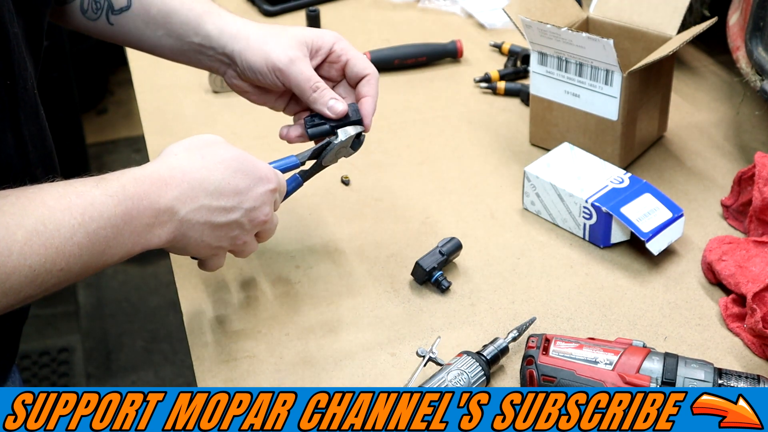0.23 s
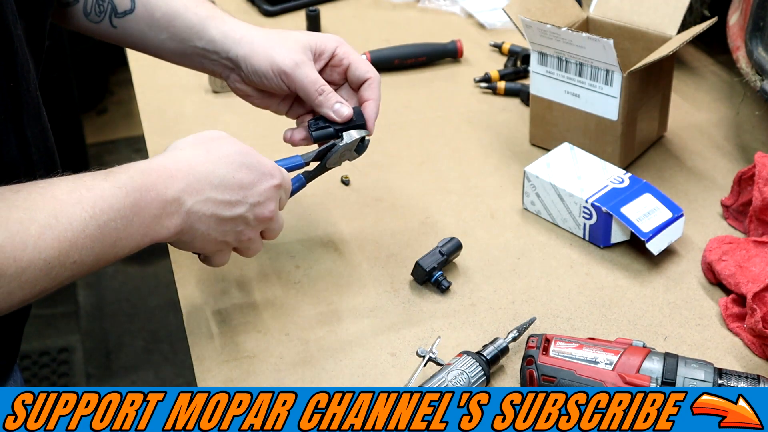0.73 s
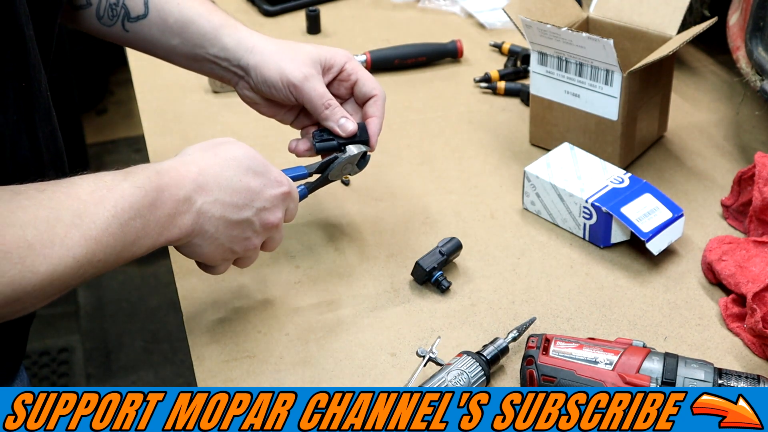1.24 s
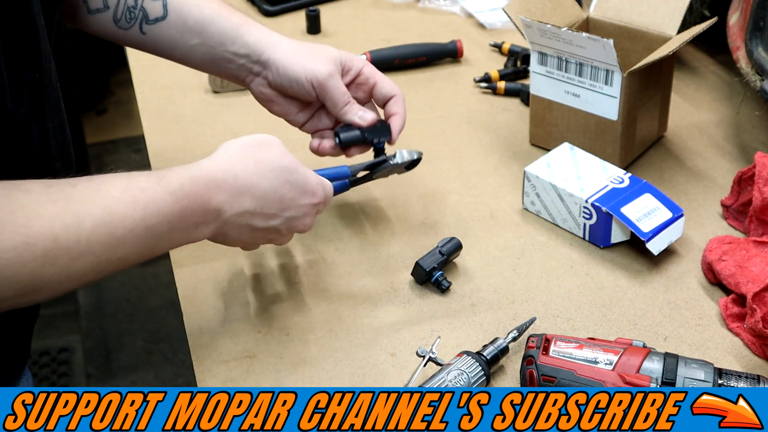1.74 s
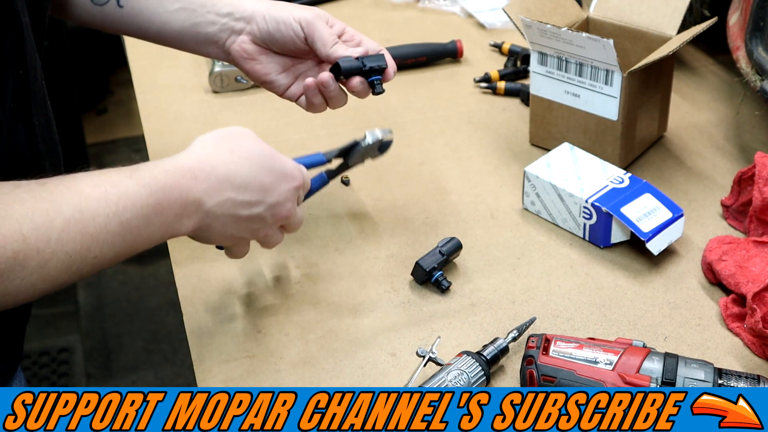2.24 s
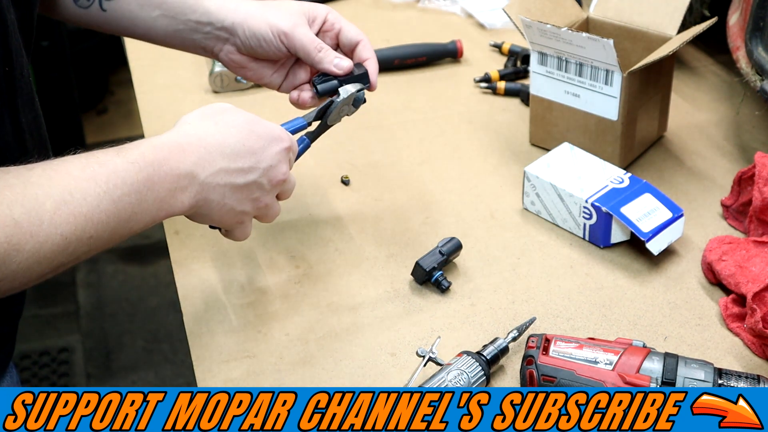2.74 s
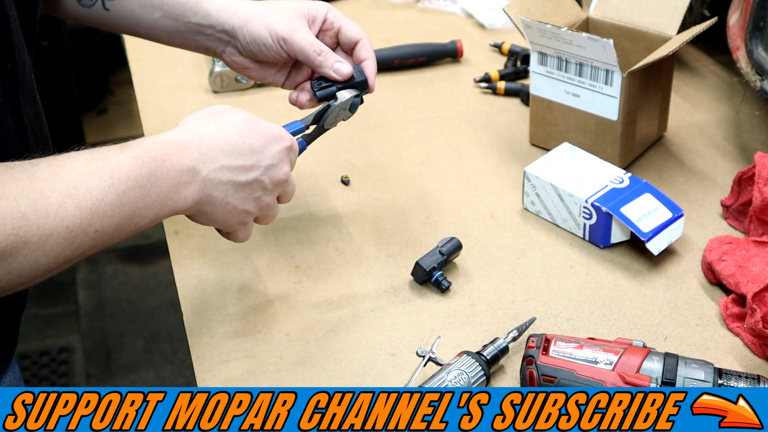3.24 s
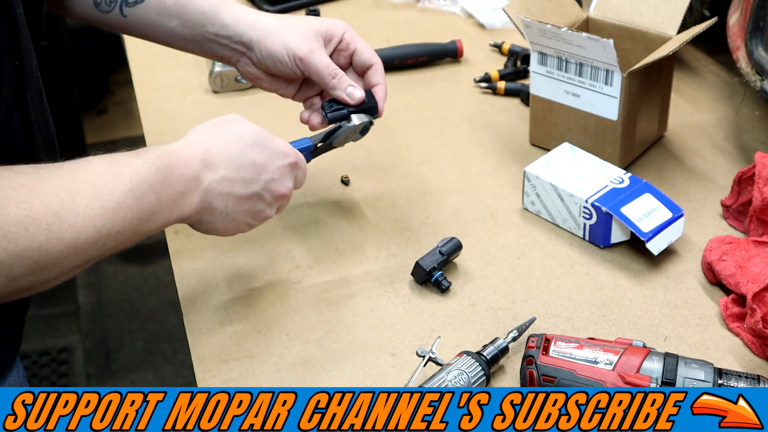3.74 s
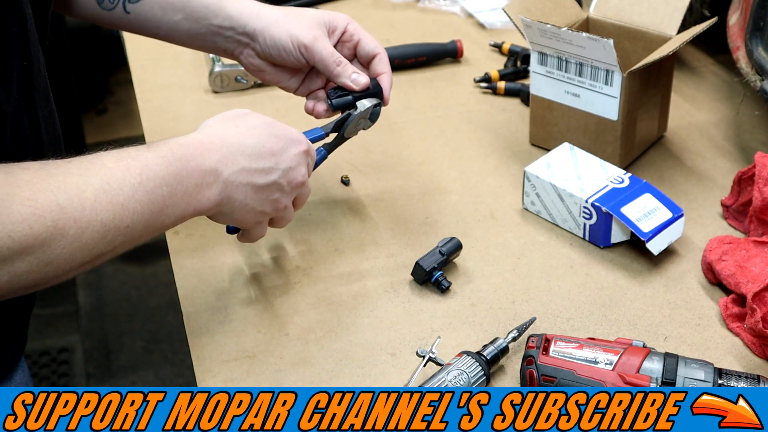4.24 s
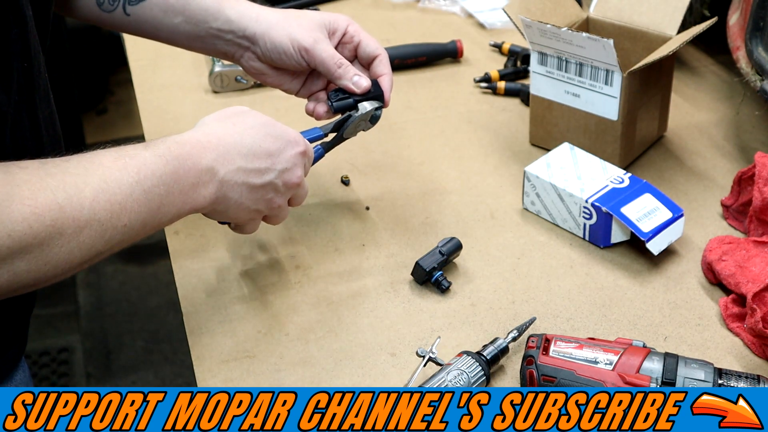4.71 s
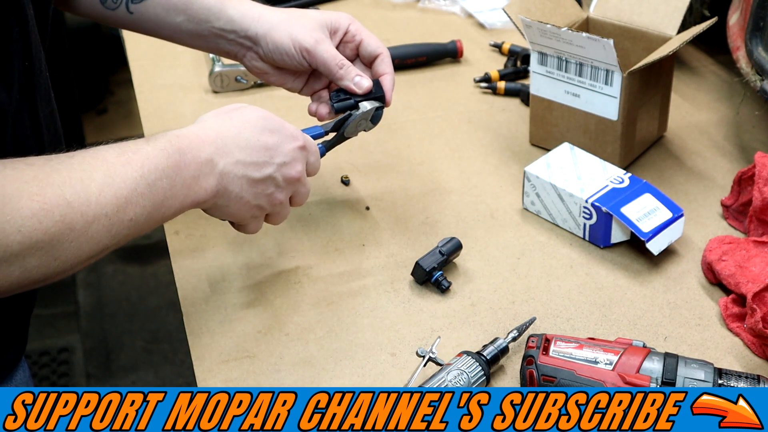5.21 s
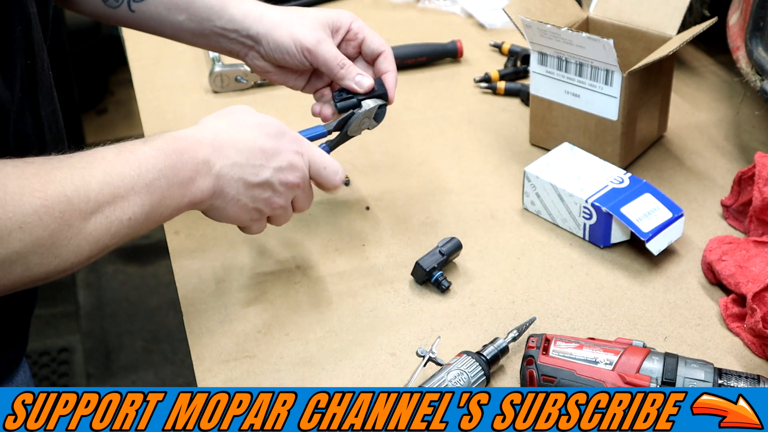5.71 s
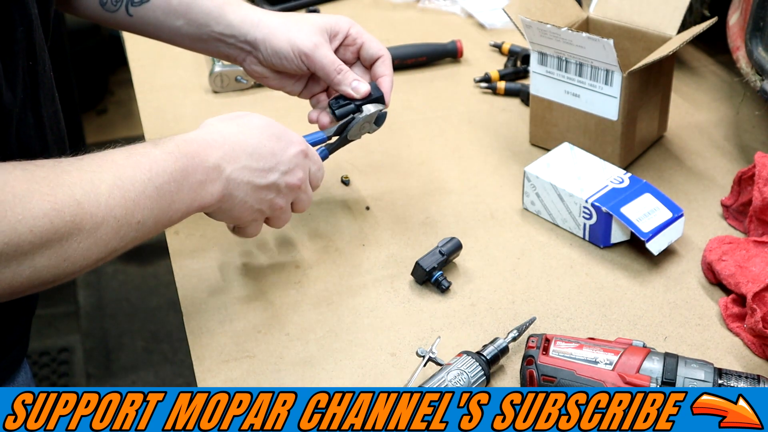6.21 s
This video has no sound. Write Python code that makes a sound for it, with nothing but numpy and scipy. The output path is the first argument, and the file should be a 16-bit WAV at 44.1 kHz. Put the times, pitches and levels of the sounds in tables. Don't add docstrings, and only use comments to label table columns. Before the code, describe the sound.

At a garage workbench, steel snips nibble at a hard plastic tab. Light ticks come first, then one very loud, bright snap with a short metallic ring. A tiny finger rub follows, then a second cut that tears in a rapid crackle, and a chip lands. Scattered faint clicks finish. Close microphone, short room echo, quiet hum, buzzing lamp and far fan.

```python
import sys
import numpy as np
from scipy import signal
from scipy.fft import rfft, irfft, next_fast_len
from scipy.io import wavfile
from scipy.ndimage import map_coordinates

SR = 44100
rng = np.random.default_rng(int(sys.argv[2]) if len(sys.argv) > 2 else 0)


def file_out(sig):
    cols = np.atleast_2d(sig).T
    lim = np.clip(cols, -1, 1)
    pcm = np.round(lim * 32767).astype(np.int16)
    wavfile.write(sys.argv[1], SR, pcm)


def level_to_linear(level):
    exponent = np.asarray(level, float) / 20
    return 10 ** exponent


N = 284886
SPAN = 32768

# frequency in Hz, level in dB.
CRACK = [(150, -36.5), (400, -32), (1100, -21.5), (1650, -24.5), (2050, -2), (4000, 2.5), (6500, 3),
         (9000, -2), (13000, -1.5), (16000, -16.5)]
# centre in Hz, width in Hz, level in dB, time to fall 60 dB in seconds.
LINGER = [(3360, 340, -44, 1.15), (4300, 1200, -45.5, 0.88), (6800, 500, -43, .9),
          (11085, 900, -43.5, 0.49)]


def unit(x):
    return x / np.sqrt(np.mean(x ** 2) + 1e-20)


def along(points, hz):
    f, v = np.transpose(points)
    return np.interp(np.log(hz + 1), np.log(f + 1), v)


def wobble(rate):
    knots = rng.standard_normal(int(N * rate / SR) + 4)
    return map_coordinates(knots, [np.arange(N) * rate / SR])


def noise(gain):
    m = next_fast_len(N + 8192)
    spectrum = rfft(rng.standard_normal(m))
    return irfft(spectrum * gain(np.fft.rfftfreq(m, 1 / SR)), m)[:N]


def peak(f, hz, width_hz):
    return f * width_hz / np.abs(hz * hz - f * f + 1j * f * width_hz)


def snips():
    out = np.zeros(N + SPAN)
    rough = unit(noise(lambda f: level_to_linear(along(CRACK, f))))
    clusters = np.array([unit(noise(lambda f: peak(f, hz, width) ** 1.3)) for hz, width, _, _ in LINGER])
    for s, db, knock_hz, knock_ms, crack_db, steel_db in contacts():
        start = round(s * SR)
        now = slice(start, start + SPAN)
        out[now] += contact(db, knock_hz, knock_ms, crack_db, steel_db, rough[now], clusters[:, now])
    return out[:N]


def contacts():
    # start in seconds, peak in dB, knock in Hz, knock t60 in ms, crack in dB over the knock.
    tear = [
        (3.7519, -12.5, 2900, 6.6, 6),
        (3.7524, -20.5, 4850, 19, -11),
        (3.7569, -19.5, 11660, 2, 6),
        (3.7588, -14, 2020, 12, -0.5),
        (3.7603, -11, 2040, 6.6, -2),
        (3.7608, -22, 3550, 14, -11),
        (3.7613, -14.5, 11600, 3.9, 2),
        (3.802, -27.5, 2000, 10, -16),
    ]
    nicks = [
        (1.5808, -46, 5000, 9.1, 0),
        (2.17, -56.5, 6200, 5, 11),
        (3.7227, -41.5, 3750, 11, 0),
        (3.7485, -50, 3970, 8, 5),
        (4.345, -61, 12500, 4, 1),
        (4.5929, -28.5, 3250, 3, -3.5),
        (4.5933, -31, 4200, 4, -2),
        (4.595, -35, 2200, 5.4, -11),
        (4.6372, -49, 12500, 3, 5),
        (4.656, -51, 2270, 6, -3),
    ]
    # start in seconds, peak in dB, knock in Hz, knock t60 in ms.
    touches = [(0.2275, -38.5, 2770, 4), (0.2283, -43, 1200, 5.5), (.2304, -45, 1200, 6.2),
               (2.8984, -33.5, 1980, 3.3), (2.8986, -47, 3310, 14), (3.7194, -44, 1510, 5),
               (3.7204, -50, 3790, 10), (3.7222, -43, 2000, 4), (4.2134, -28, 2000, 2.8),
               (4.2142, -50, 3280, 28), (4.2143, -51, 4750, 9), (4.4183, -34, 2000, 3.6),
               (4.4185, -48, 3370, 6.3), (4.4256, -38.5, 1990, 6), (5.4232, -43, 2100, 9.8)]
    # peak in dB, frequency in Hz, t60 in ms.
    edges = [(-8, 5600, 3.5), (-7, 11800, 5)]
    slack_s = [1.056, 1.0622]
    # peak in dB, frequency in Hz, t60 in ms.
    pivot = [(-36, 4520, 7), (-44, 3750, 12), (-43, 9700, 4.5), (-37, 14300, 4)]

    soft_crack_db, soft_steel_db, nick_steel_db = -24, -25, -28
    snap_s, snap_ms, rebound_s = 1.5824, 8, 0.0032
    bites = [(snap_s, -4.5, 2288, snap_ms, 9, -4.5), (snap_s + rebound_s, -19, 3364, snap_ms, 5, -16)]
    bites += [(snap_s, *mode, soft_crack_db, soft_steel_db) for mode in edges]
    bites += [(*row, -24.5) for row in tear]
    bites += [(*row, nick_steel_db) for row in nicks]
    bites += [(*row, soft_crack_db, soft_steel_db) for row in touches]
    bites += [(s, *mode, -12, nick_steel_db) for s in slack_s for mode in pivot]
    return bites


def contact(db, knock_hz, knock_ms, crack_db, steel_db, rough, clusters):
    # frequency in Hz, level in dB, t60 in seconds.
    steel = [(3340, -7, 0.05), (3230, 0, 0.018), (3540, -7, .035), (4850, -7, 0.016), (6590, 1.5, .02),
             (6770, -11, 0.05), (8250, -6.5, 0.0089), (9710, -9, 0.013), (10900, -1.5, 0.015),
             (11600, -2, 0.026)]
    # delay in seconds, level in dB.
    walls = [(.0032, -12), (.0071, -20), (0.0096, -24), (.013, -22), (0.016, -26), (.022, -28.5),
             (.029, -26)]
    t = np.arange(SPAN) / SR

    knock = level_to_linear(2.5 - 60 * t / (knock_ms / 1000)) * np.sin(2 * np.pi * knock_hz * t)
    knock = knock * (1 - np.exp(-2 * knock_hz * t))
    crack = rough * level_to_linear(crack_db - 2 - 60 * t / 0.0054) * (1 - np.exp(-t / 0.000067))

    def wake(hz):
        return level_to_linear(steel_db + min(crack_db, 0) * np.log2(hz / steel[0][0]))

    ring = np.zeros(SPAN)
    for hz, mode_db, t60 in steel:
        fade = level_to_linear(mode_db - 6 + rng.normal(0, 1.2) - 60 * t / t60)
        ring += wake(hz) * fade * np.sin(2 * np.pi * hz * t)
    linger = np.zeros(SPAN)
    for (hz, _, cluster_db, t60), band in zip(LINGER, clusters):
        linger += wake(hz) * level_to_linear(cluster_db + 11 - 60 * t / t60) * band
    linger = linger * (1 - np.exp(-t / 0.005))

    echoes = np.zeros(SR // 20)
    echoes[0] = 1
    for delay, wall_db in walls:
        echoes[round(delay * SR)] = level_to_linear(wall_db) * rng.choice([-1, 1])
    near = signal.fftconvolve(knock + crack + ring, echoes)[:SPAN]

    far = signal.fftconvolve(level_to_linear(-5.5) * knock + ring, tail([(20, 0), (20000, 0)]))[:SPAN]
    far = far + np.linalg.norm(crack) * tail(CRACK)
    return level_to_linear(db) * (near + linger + level_to_linear(-10.5) * far)


def tail(colour):
    # frequency in Hz, t60 in seconds.
    garage = [(100, 0.37), (500, .47), (1500, 0.48), (3300, 0.3), (7000, 0.38), (12000, .18),
              (16000, 0.085)]
    hz, t, z = signal.stft(rng.standard_normal(SPAN), SR, nperseg=256)
    t60 = along(garage, hz)[:, None]
    corner = level_to_linear(-60 * t / t60)
    bay = level_to_linear(-21 - 60 * t / (3.7 * t60))
    z = z * np.hypot(corner, bay) * level_to_linear(along(colour, hz))[:, None]
    x = signal.istft(z, SR, nperseg=256)[1][:SPAN]
    x = x * (1 - np.exp(-np.arange(SPAN) / SR / 0.004))
    return x / np.linalg.norm(x)


def thumps():
    # start in seconds, level in dB, frequency in Hz, t60 in ms.
    jolts = [
        (1.582, -40, 245, 50),
        (1.583, -32, 764, 27),
        (3.7521, -38, 270, 25),
        (3.7584, -33.5, 247, 33),
        (3.76, -22, 680, 8),
    ]
    out = np.zeros(N + SR)
    t = np.arange(SR // 4) / SR
    for s, db, hz, ms in jolts:
        swing = np.sin(2 * np.pi * hz * t) * (1 - np.exp(-t * hz))
        out[round(s * SR):][:len(t)] += level_to_linear(db + 6.5 - 60 * t / (ms / 1000)) * swing
    return out[:N]


def thuds():
    # start in seconds, peak in dB.
    shakes = [
        (1.5824, -30),
        (3.7523, -32),
        (3.7598, -29),
        (3.8, -41),
        (4.4185, -41),
        (3.2, -42),
        (2.8985, -43),
    ]
    # frequency in Hz, level in dB.
    bench = [(25, -20), (60, -14), (150, -6), (400, 0), (900, 0), (1400, -4), (2500, -30)]
    push_s, room_db = 0.00033, 6
    out = np.zeros(N + SPAN)
    u = np.arange(SPAN) / SR / push_s
    push = (1 - u) * np.exp(-u)
    for s, db in shakes:
        answer = level_to_linear(room_db) * np.linalg.norm(push) * tail(bench)
        out[round(s * SR):][:SPAN] += level_to_linear(db) * (push + answer)
    return out[:N]


def rub():
    # frequency in Hz, level in dB.
    skin = [(5000, -28), (9000, -2.5), (13000, -3), (16000, -1)]
    start_s, level_db, attack_s, fade_db_per_s = 2.168, -56.5, 0.006, 200
    t = np.maximum(np.arange(N) / SR - start_s, 0)
    grain_db = 3 * wobble(300)
    slide = (1 - np.exp(-t / attack_s)) * level_to_linear(level_db - fade_db_per_s * t + grain_db)
    return slide * unit(noise(lambda f: level_to_linear(along(skin, f))))


def mains():
    # multiple of the mains frequency, level in dB rms.
    hum = [(1, -62.9), (2, -71.6), (4, -65.8), (5, -83.0), (6, -74.7), (12, -66.8), (13, -79.7),
           (14, -70.2), (16, -79.1), (17, -85.0), (18, -74.9), (19, -84.3), (20, -75.3), (24, -75.6),
           (25, -85.0), (26, -79.8), (29, -83.4), (34, -84.6), (35, -82.6), (38, -84.7)]
    # frequency in Hz, width in Hz, level in dB rms per line.
    lamp = [(1352, 76, -81.5), (2200, 450, -91.5), (2900, 850, -93), (3600, 400, -90), (4407, 490, -94),
            (5110, 300, -88.5), (6162, 650, -83), (8023, 490, -89), (9920, 700, -95.5), (11780, 900, -100),
            (13400, 500, -104)]
    repeat_hz = 59.98 / 3
    size = 2 ** 15
    k = np.arange(1, 800)
    power = sum((level_to_linear(db) * peak(k * repeat_hz, hz, width) ** 1.5) ** 2 for hz, width, db in lamp)
    lines = np.zeros(size // 2 + 1, complex)
    uneven = level_to_linear(rng.normal(-1.5, 4, len(k)))
    lines[k] = np.sqrt(power) * uneven * np.exp(2j * np.pi * rng.random(len(k)))
    for order, db in hum:
        lines[3 * int(order)] = level_to_linear(db) * np.exp(2j * np.pi * rng.random())
    pattern = irfft(lines, size) * size / np.sqrt(2)
    turns = repeat_hz * (np.arange(N) / SR + 1.2e-5 * wobble(4))
    return np.interp(turns % 1 * size, np.arange(size + 1), np.append(pattern, pattern[0]))


def air():
    # frequency in Hz, level in dB per Hz.
    hiss_colour = [(25, -92), (45, -92), (90, -90), (170, -93.5), (300, -97), (450, -99), (900, -95),
                   (1300, -104), (2100, -103), (2700, -108), (5000, -113), (9000, -114), (16000, -116)]
    # frequency in Hz, width in Hz, level in dB over the load curve (third tone:
    fan = [(278, 8, -4), (550, 12, 0), (838, 45, 3)]
    # time in seconds, level of the second tone in dB.
    load = [(0, -82), (2.2, -82.5), (3.55, -80), (4.1, -74), (4.7, -79.5), (5.3, -73), (5.6, -78.5),
            (6.46, -76)]
    hiss = noise(lambda f: level_to_linear(along(hiss_colour, f)) * np.sqrt(SR / 2))
    load_db = np.interp(np.arange(N) / SR, *np.transpose(load))
    third_db = -76.5 + 0.6 * (load_db - load_db.mean())
    bands = []
    for hz, width, db in fan:
        band = unit(noise(lambda f: peak(f, hz, width) ** 2))
        bands.append(level_to_linear(db + 2 * wobble(3.05)) * band)
    return hiss * level_to_linear(0.5 * wobble(2.6)) + level_to_linear(load_db) * (bands[0] + bands[1]) + level_to_linear(third_db) * bands[2]


def scene():
    return (snips() + thumps() + thuds() + rub() + mains() + air())[None]


def low_pass(x):
    return signal.sosfilt(signal.butter(12, 16140, fs=SR, output="sos"), x)


def record(dry):
    top, top_hz = 1.15, 15950
    flat = dry / (1 + np.abs(dry / top) ** 6) ** (1 / 6)
    edge = np.clip((top_hz - np.fft.rfftfreq(N, 1 / SR)) / 250, 0, 1)
    return low_pass(irfft(rfft(flat) * edge, N))


dry = scene()
out = record(dry)
file_out(out)
```